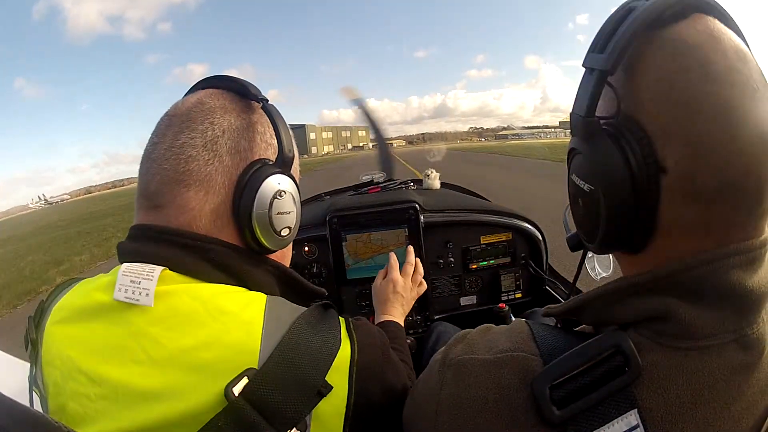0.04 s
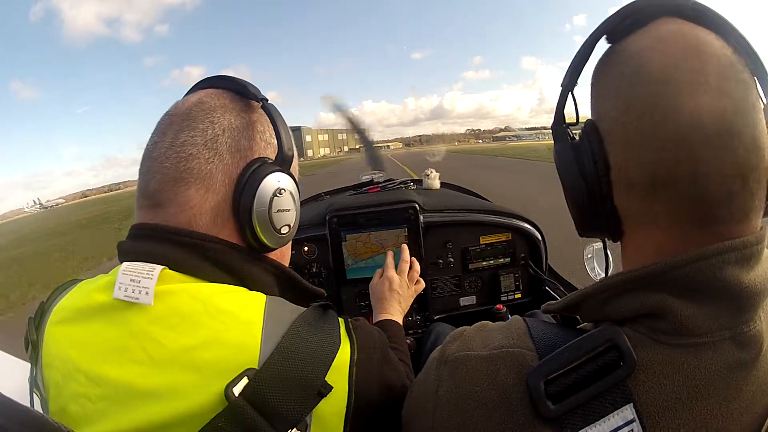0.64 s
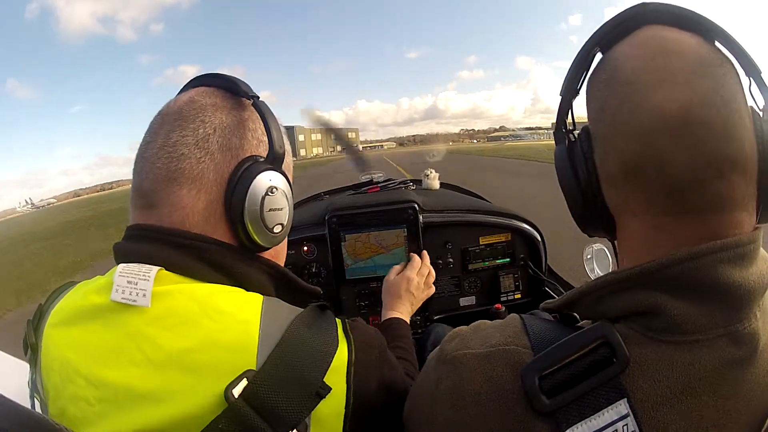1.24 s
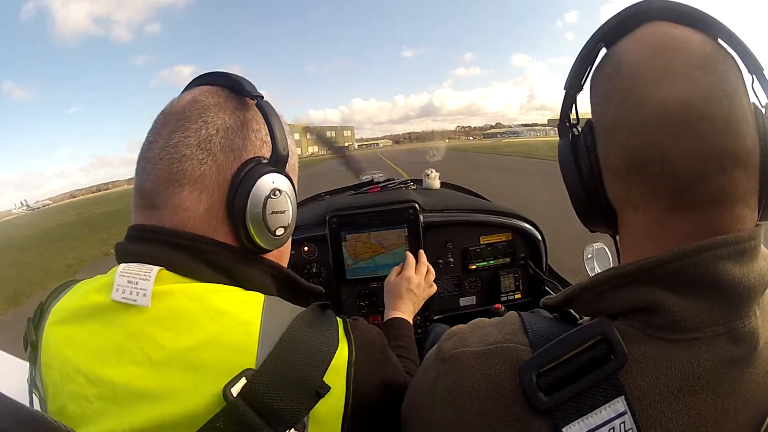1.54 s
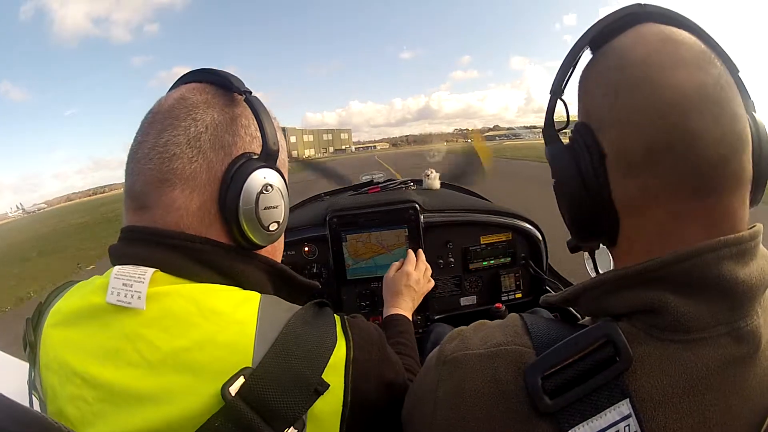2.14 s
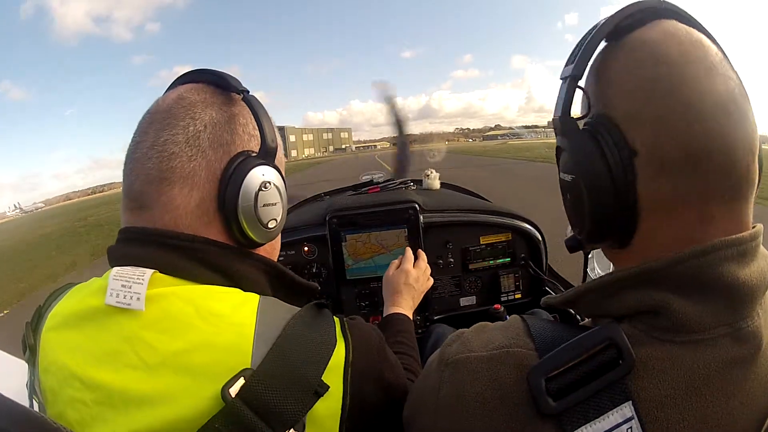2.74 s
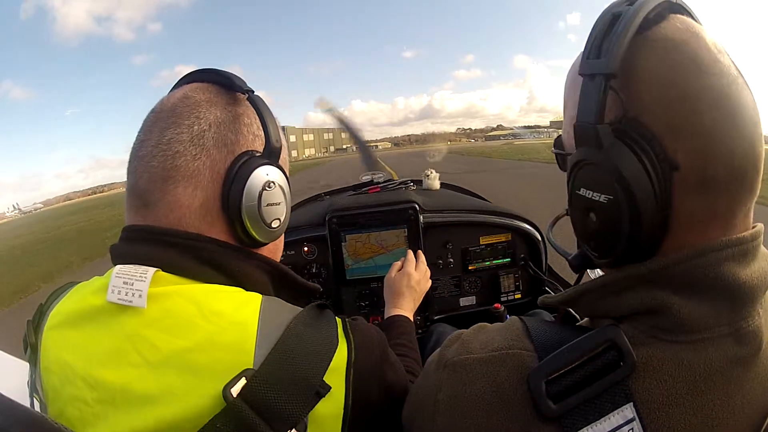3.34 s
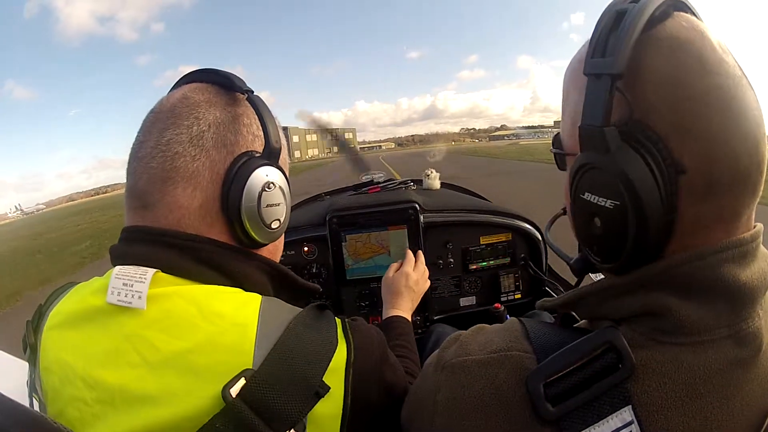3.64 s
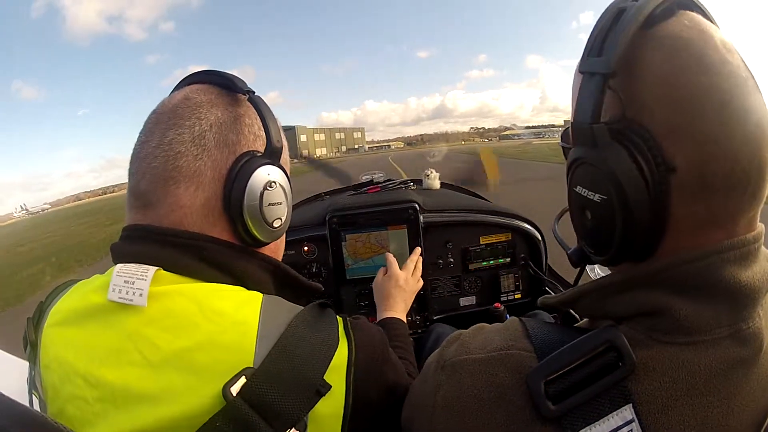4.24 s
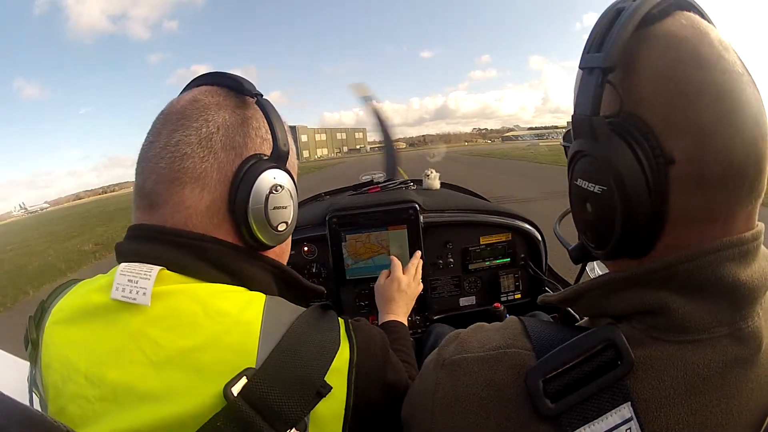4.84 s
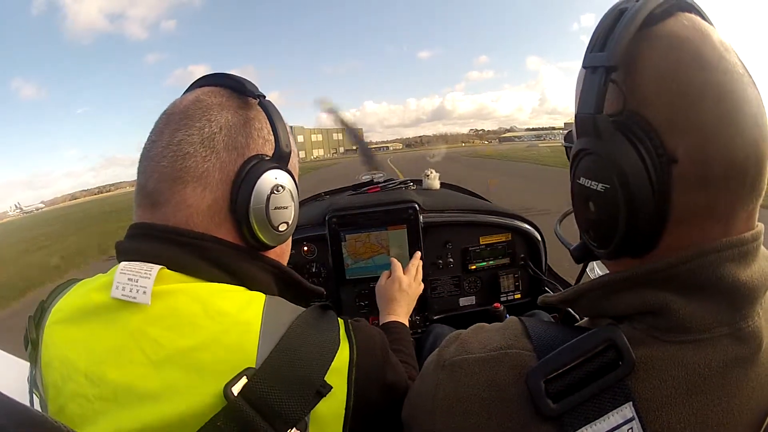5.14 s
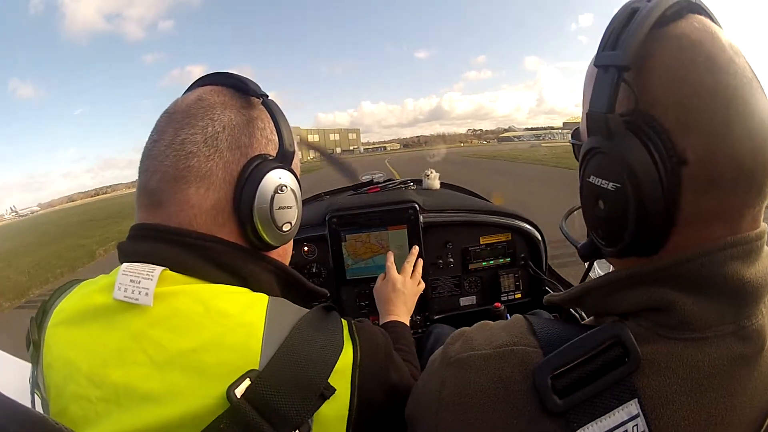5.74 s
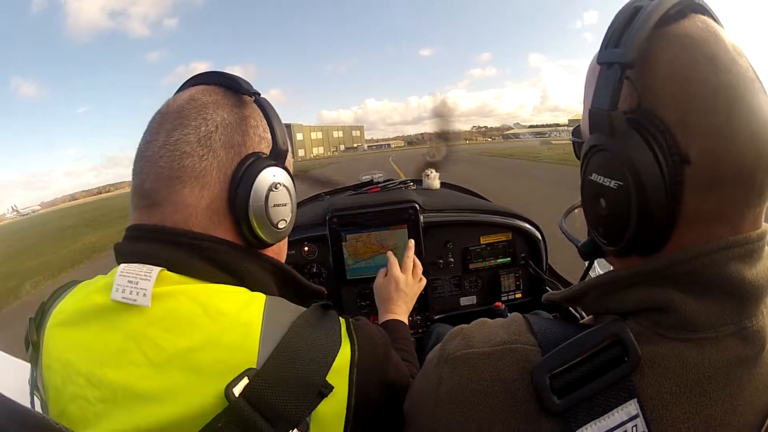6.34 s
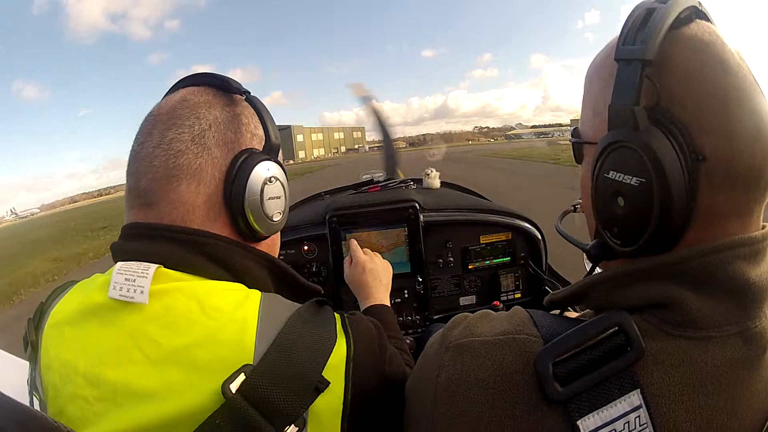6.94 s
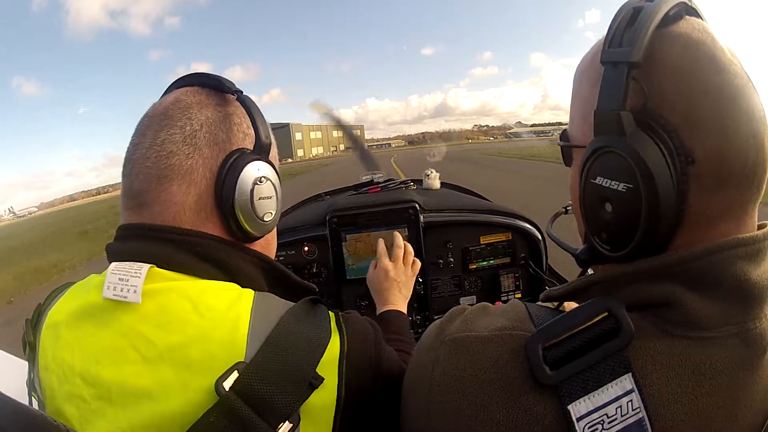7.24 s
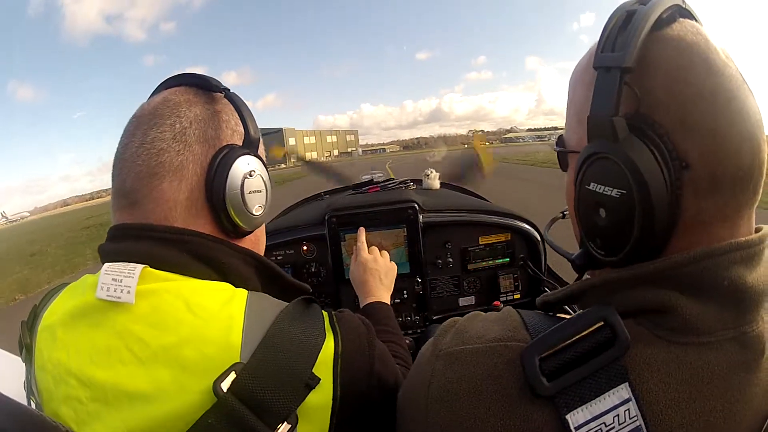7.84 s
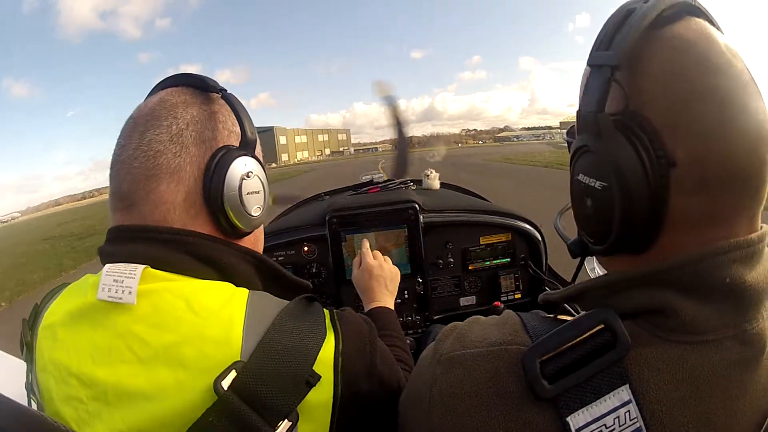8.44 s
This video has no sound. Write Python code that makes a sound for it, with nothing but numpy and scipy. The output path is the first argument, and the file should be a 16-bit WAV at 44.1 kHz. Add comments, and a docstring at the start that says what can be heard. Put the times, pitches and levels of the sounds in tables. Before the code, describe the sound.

A light aircraft taxis, heard from inside the closed cockpit. Its piston engine and propeller make a low, booming drone that shakes the panels, with soft air hiss and a faint high whistle. Clothing brushes softly at first. Then bumps make a plastic housing tick and knock close to the microphone. Near the end the knocks come more often and the engine speeds up slightly.

```python
"""A light aircraft taxis, heard from inside the closed cockpit. From the start the four-cylinder
engine and its propeller drone and boom in the cabin, exhaust shakes the panels, air hisses past the
canopy and the recorder adds a thin high whistle. In the first second, clothing brushes the seat.
Then bumps in the taxiway make the camera's plastic housing tick and knock. Near the end the knocks
come more often and the engine speeds up a little."""
import sys
import numpy as np
from scipy import signal
from scipy.fft import rfft, irfft, next_fast_len
from scipy.io import wavfile
from scipy.ndimage import map_coordinates

SR = 44100
rng = np.random.default_rng(int(sys.argv[2]) if len(sys.argv) > 2 else 0)


def master(y):
    """Save y as 16-bit WAV."""
    cut = np.clip(np.atleast_2d(y).T, -1, 1)
    pcm = np.round(cut * 32767)  # scale
    wavfile.write(sys.argv[1], SR, pcm.astype(np.int16))


N = 373968
TIME = np.arange(N) / SR

# Clothing brushing the seat. Each row: middle in seconds, half length in seconds, level in dB.
BRUSHES = [(0.236, 0.021, -44), (0.744, 0.031, -42.5), (0.884, 0.079, -43)]
# The tone colour of the cloth. Each row: frequency in Hz, relative level in dB.
CLOTH_COLOUR = [(800, -23), (2500, -9), (3500, -6), (4500, 2), (5500, -10), (7500, -2), (10000, -24),
                (15000, -30)]
# How strongly the air hisses. Each row: time in seconds, relative level in dB.
HISS_LEVELS = [(0, -48.5), (2, -50), (3.4, -51.5), (5.4, -49.5), (6, -51.5), (6.7, -48), (8.48, -49.5)]
# The tone colour of that hiss. Each row: frequency in Hz, relative level in dB.
HISS_COLOUR = [(400, -31), (1000, 7), (1400, 4), (1550, 0.5), (1750, 4), (1980, 4), (2300, -0.5),
               (3100, -2), (3900, -3), (4500, -1), (5300, -5.5), (6050, -17.5), (7400, -1.5), (15000, -20)]
# Bumps that jolt the aircraft. Each row: time in seconds, rise of the panel roar in dB.
BUMPS = [(1.05, 2), (2.56, 3.5), (6.68, 7.5), (8.24, 3)]
# How hard the aircraft's frame shakes. Each row: time in seconds, level in dB.
SHAKE_LEVELS = [(0, -16), (.6, -19.5), (1.2, -17.5), (5, -17.5), (6, -18), (7.2, -17), (7.7, -14.5),
                (8.48, -17.5)]
# The tone colour of the frame's rumble. Each row: frequency in Hz, relative level in dB.
RUMBLE_COLOUR = [(8, -33), (15, -20), (21, -5), (28, -19), (48, -1.5), (62, 1.5), (90, 4), (112, 1),
                 (140, 2.5), (175, 3.5), (205, -3.5), (280, -14.5), (400, -45), (800, -100)]
# How loudly the panels roar between bumps. Each row: time in seconds, level in dB.
ROAR_LEVELS = [(0, -24), (.7, -23.5), (1.8, -27), (3.5, -27), (4.4, -24.5), (6.2, -25.5), (6.8, -24),
               (8.48, -24)]
# Where the panels ring. Each row: frequency in Hz, width in Hz, relative level in dB.
PANEL_RESONANCES = [(215, 85, -4.5), (266, 63.4, 0.5), (360, 62, -5.5), (413, 88, -8), (468, 53, -5),
                    (583, 84, -17.5), (667, 135, -7), (816, 170, -26.5), (916, 101, -17),
                    (1142, 118, -17.5), (1280, 110, -32.5), (1530, 57, -24.5), (1969, 65, -26)]
# Knocks of the housing. Each row: start in seconds, strength in dB, thud in dB (more ring, duller crack).
KNOCKS = [(1.012, -17, -16), (1.063, -8.5, -6.5), (1.344, -31, 4), (1.366, -19.5, 5), (1.408, -23, 10.5),
          (1.609, -16, .5), (2.554, -4, -1), (2.57, -14, 5), (2.584, -20, 10), (2.907, -12.5, 0),
          (2.966, -13.5, -1), (3.758, -23, -15), (5.002, -25, -5), (5.701, -20, -7), (5.794, -27, -5),
          (5.883, -15.5, -2), (6.387, -21.5, -8), (6.67, -14.5, -5), (6.679, -12.5, 1), (6.772, -16, 5.5),
          (6.8937, -9, 2), (6.949, -19, -1), (7.5564, -10, 5.5), (7.86, -13.5, -6), (7.891, -9, -3),
          (7.915, -7, -3), (8.111, -16, 2), (8.186, -7, -0.5), (8.247, -9.5, 0), (8.442, -14.5, 9)]
# The housing's notes. Each row: frequency in Hz, relative level in dB, seconds to fade by 60 dB.
HOUSING_NOTES = [(366, 5, 0.042), (448, -2, 0.093), (806, -4.5, 0.066), (1097, -7.5, 0.037),
                 (1315.9, -13.5, 0.09), (1640, -10, 0.0092), (2053, -10, 0.027)]
# The tone colour of a knock's crack. Each row: frequency in Hz, relative level in dB.
CRACK_COLOUR = [(150, -14), (450, 8.5), (800, 6.5), (2000, -2.5), (3200, -5), (4400, -4.5), (5400, -15),
                (6050, -19), (7400, -11), (10000, -15), (15000, -26)]
# The swelling boom of the cabin air. Each row: time in seconds, level in dB.
BOOM_LEVELS = [(0.0, -25.5), (0.24, -17), (0.92, -13), (1.12, -24.5), (1.48, -14), (1.68, -22.0),
               (1.84, -13.5), (3.2, -22.5), (3.32, -17), (3.88, -23.5), (4.04, -14), (4.52, -22),
               (4.76, -11.5), (5.28, -19.0), (5.52, -13.0), (6.08, -27), (6.28, -15.5), (6.6, -27),
               (6.84, -14), (7.0, -23), (7.12, -15.0), (7.56, -11.5), (7.72, -27.5), (8.12, -10.5),
               (8.24, -21.0), (8.44, -17)]
# The pulse of the passing propeller blades. Each row: time in seconds, level in dB.
BLADE_LEVELS = [(0, -31), (.8, -24), (1.2, -40), (8.48, -31)]
# The throb at twice the blade rate. Each row: time in seconds, relative level in dB.
THROB_LEVELS = [(0.0, -23.5), (0.32, -32), (1.0, -20.0), (1.6, -27.5), (2.4, -17), (2.6, -34), (2.8, -18),
                (3.48, -35), (3.84, -18.5), (4.56, -26.5), (4.88, -20.5), (6.2, -26), (6.44, -13),
                (6.84, -31), (7.08, -17), (7.48, -28.5), (7.68, -17.5), (8.44, -26)]
# How fast the engine runs. Each row: time in seconds, crankshaft turns per second.
ENGINE_SPEED = [(0, 32.3), (.8, 31.5), (2.2, 31.6), (3, 32.3), (5.7, 32.1), (6.7, 32.45), (7.5, 32.7),
                (8.48, 33.6)]
# The engine's tones. Each row: cycles per crankshaft turn, level in dB compared with the shake.
ENGINE_TONES = [(1, -14.5), (2, -9.5), (3, -12.5), (7, -29), (8, -21.5), (11, -23), (13, -26.5), (14, -29),
                (36, -38)]
# The hum at twice the firing rate. Each row: time in seconds, level in dB compared with the shake.
HUM_LEVELS = [(0, -12), (.5, -10), (1.36, -8), (4.9, -3.5), (6, -8.5), (7.48, -7.5), (8.48, -8.5)]
# The recorder's fading treble. Each row: frequency in Hz, gain in dB.
RECORDER_TREBLE = [(13000, -0.5), (13600, -2), (15000, -9)]


def amp(db):
    """Turn decibels into a gain."""
    return 10 ** (np.asarray(db) / 20)


def unit(x):
    """Scale a signal to an average (rms) level of 1."""
    return x / np.sqrt(np.mean(x ** 2) + 1e-20)


def curve(rows):
    """Join (time, value) rows with straight lines, giving one value per sample."""
    return np.interp(TIME, *np.transpose(rows))


def wobble(rate):
    """A smooth random curve through `rate` points a second."""
    return map_coordinates(rng.standard_normal(4096), [TIME * rate + 2], mode="wrap")


def shape(points):
    """Turn (Hz, dB) rows into a gain for any frequency."""
    f, db = np.transpose(points)
    return lambda hz: amp(np.interp(np.log(hz + 1), np.log(f), db))


def filtered(x, response):
    """Give each frequency in x its own gain."""
    size = next_fast_len(len(x) + 8192)
    return irfft(rfft(x, size) * response(np.fft.rfftfreq(size, 1 / SR)), size)[:len(x)]


def noise(response, size=N):
    """Noise of level 1 with the given tone colour."""
    return unit(filtered(rng.standard_normal(size), response))


def drifting_tone(cycles, multiple, drift_db, rate):
    """A tone that swells and dips as a random part of it drifts in and out of step."""
    drift = 1 + amp(drift_db) * (wobble(rate) + 1j * wobble(rate))
    return unit(np.real(drift * np.exp(2j * np.pi * (multiple * cycles + rng.random()))))


def clothing(grain_db=3.5):
    """Cloth rubs on the seat in short, grainy swishes."""
    strokes = sum(amp(db) * np.exp(-((TIME - s) / half) ** 2) for s, half, db in BRUSHES)
    return strokes * unit(noise(shape(CLOTH_COLOUR)) * amp(grain_db * wobble(150)))


def trim_rattle(level_db=-50, spread_db=3.5, ticks_per_s=48, fade_s=0.028):
    """Loose cabin trim chatters in small ticks of uneven size."""
    hits = rng.random(N) < ticks_per_s / SR
    sizes = amp(spread_db * np.clip(rng.standard_normal(N), -2, 1))
    bursts = signal.fftconvolve(hits * sizes, amp(-60 * TIME[:2048] / fade_s))[:N]
    colour = shape([(500, -1.5), (1300, 3), (2000, -4), (2650, 4.5), (3300, -12), (4500, 0),
                    (6000, -18.5), (15000, -11)])
    return amp(level_db) * unit(filtered(bursts * rng.standard_normal(N), colour))


def canopy_hiss(turns, depth=0.15):
    """Air from the propeller hisses over the canopy, fluttering once per crankshaft turn."""
    flutter = 1 + depth * np.cos(2 * np.pi * turns)
    level_db = curve(HISS_LEVELS) + 4.0 + 0.79 * wobble(25)
    return amp(level_db) * flutter * noise(shape(HISS_COLOUR))


def taxiway_jolts(half_length_s=0.022):
    """Each bump gives a brief rise in level, in dB."""
    return sum(db * np.exp(-((TIME - s) / half_length_s) ** 2) for s, db in BUMPS)


def frame_rumble(shake_db, gain_db=-2.0):
    """The shaking frame makes a low rumble."""
    return amp(shake_db + gain_db) * noise(shape(RUMBLE_COLOUR))


def panel_roar(turns, level_db, depth=0.15, waver_db=0.36):
    """Exhaust puffs, two to a turn, shake the cabin panels."""
    def panels(hz):
        return sum(amp(db) / (1 + (2 * (hz - centre) / width) ** 2)
                   for centre, width, db in PANEL_RESONANCES)
    puffs = (1 + depth * np.cos(2 * np.pi * 2 * turns)) * rng.standard_normal(N)
    return amp(level_db + waver_db * wobble(14)) * unit(filtered(puffs, panels))


def housing_knocks(crack_db=-5.0, tail_db=-16, ring_db=-9, dulling=0.32,
                   crack_s=0.0081, tail_s=0.068, rise_s=0.00028):
    """Each knock on the plastic housing is a sharp crack, a short buzzing tail and a ring."""
    out, t = np.zeros(N + SR), TIME[:SR // 4]
    fade = amp(crack_db - 60 * t / crack_s) + amp(tail_db - 60 * t / tail_s)
    attack = 1 - np.exp(-t / rise_s)
    for start, db, thud_db in KNOCKS:
        def colour(hz):
            # heavier blows stay in contact longer, so their crack is duller
            octaves = np.log2(np.clip(hz, 1200, 6000))
            return shape(CRACK_COLOUR)(hz) * amp(-dulling * thud_db * octaves)
        crack = fade * noise(colour, size=len(t))
        ring = np.zeros(len(t))
        for hz, note_db, fade_s in HOUSING_NOTES:
            loudness = amp(note_db + rng.normal(0, 1.25) - 60 * t / fade_s)
            pitch = hz * rng.normal(1, .012)
            ring += loudness * np.sin(2 * np.pi * (pitch * t + rng.random()))
        out[round(start * SR):][:len(t)] += amp(db) * attack * (crack + amp(ring_db + thud_db) * ring)
    return out[:N]


def cabin_boom(blade_passes):
    """The cabin air booms at a pitch that engine and propeller share, swelling and dipping."""
    return amp(curve(BOOM_LEVELS)) * drifting_tone(blade_passes, multiple=4, drift_db=-12.5, rate=16)


def propeller(blade_passes, throb_gain_db=-0.5):
    """Each passing blade pushes the air, making a low pulse and a throb an octave above it."""
    pulse = drifting_tone(blade_passes, multiple=1, drift_db=-11, rate=4.2)
    throb = drifting_tone(blade_passes, multiple=2, drift_db=-12, rate=8)
    return amp(curve(BLADE_LEVELS)) * pulse + amp(curve(THROB_LEVELS) + throb_gain_db) * throb


def engine(turns, shake_db, waver_db=1.5, waver_radians=0.37, rate=6):
    """Tones and a hum follow the crankshaft; uneven burning of the fuel makes them waver."""
    tones = np.zeros(N)
    for multiple, db in ENGINE_TONES:
        phase = 2 * np.pi * (multiple * turns + rng.random()) + waver_radians * wobble(rate)
        tones += amp(db) * unit(amp(waver_db * wobble(rate)) * np.sin(phase))
    hum = amp(curve(HUM_LEVELS)) * drifting_tone(turns, multiple=4, drift_db=-15.5, rate=8)
    return amp(shake_db) * (tones + hum)


def scene(sway_db=1.0, sway_rate=8, jolt_share=0.43):
    """Add up all the sounds in the cabin while the uneven taxiway sways the frame."""
    turns = np.cumsum(curve(ENGINE_SPEED)) / SR
    # three geared-down blades pass five times in four crankshaft turns
    blade_passes = 5 / 4 * turns
    jolt_db = taxiway_jolts()
    shake_db = curve(SHAKE_LEVELS) + jolt_share * jolt_db + sway_db * wobble(sway_rate)
    drone = engine(turns, shake_db) + propeller(blade_passes) + cabin_boom(blade_passes)
    rush = frame_rumble(shake_db) + panel_roar(turns, curve(ROAR_LEVELS) + jolt_db) + canopy_hiss(turns)
    return (drone + rush + trim_rattle() + housing_knocks() + clothing())[None]


def record(dry, jitter_s=2.8e-5, whistle_hz=12000, clip_at=0.71, top_hz=15300):
    """The recorder's timing wavers, turning the drone into a faint whistle; peaks and treble are cut."""
    late_samples = jitter_s * SR * np.sin(2 * np.pi * whistle_hz * TIME)
    sampled = map_coordinates(dry[0], [np.arange(N) + late_samples], mode="nearest")
    clipped = np.clip(sampled, -clip_at, clip_at)
    return filtered(clipped, lambda hz: shape(RECORDER_TREBLE)(hz) * (hz < top_hz))[None]


dry = scene()
out = record(dry)
master(out)
```